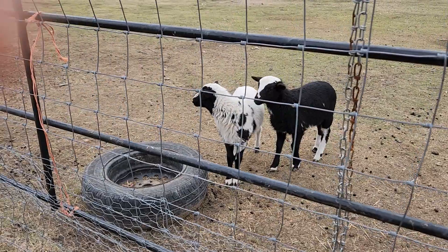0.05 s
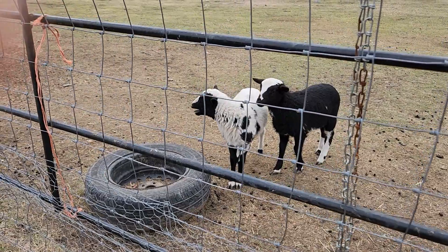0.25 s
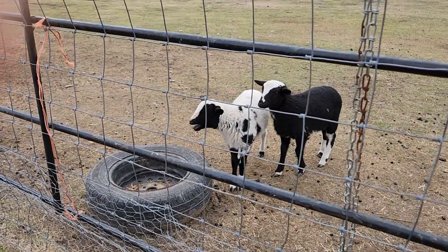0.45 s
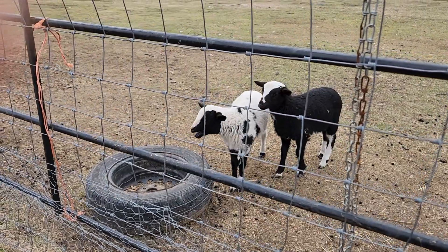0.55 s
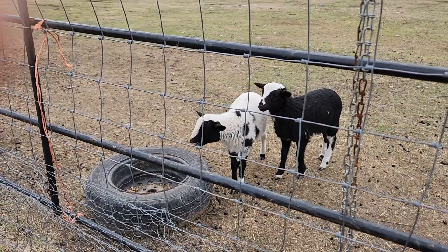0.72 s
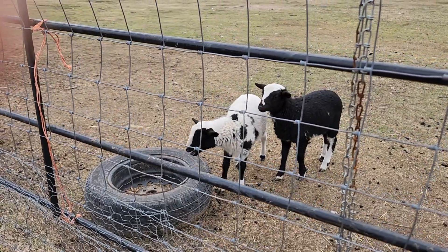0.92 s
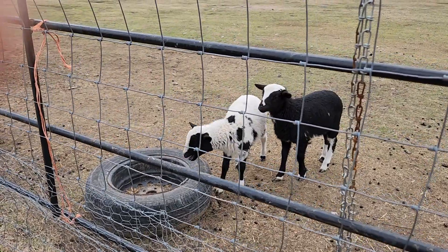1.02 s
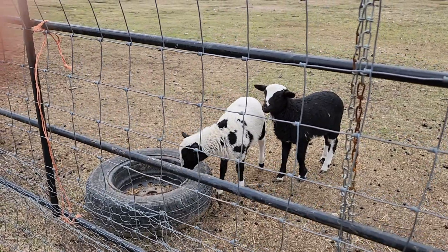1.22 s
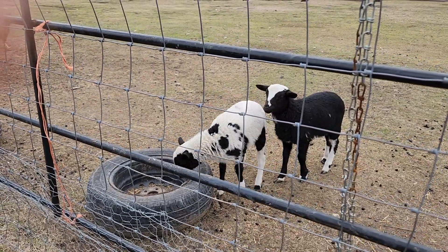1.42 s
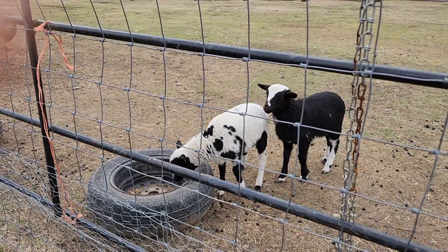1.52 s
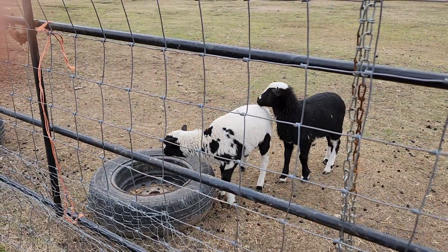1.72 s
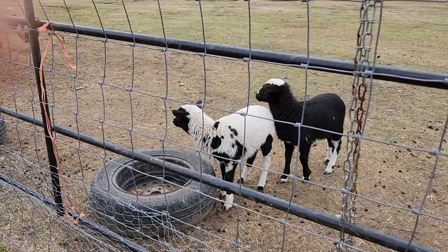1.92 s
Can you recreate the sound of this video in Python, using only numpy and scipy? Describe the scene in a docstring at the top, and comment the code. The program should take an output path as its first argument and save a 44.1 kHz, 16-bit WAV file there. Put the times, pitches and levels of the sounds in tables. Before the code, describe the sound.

A lamb gives one long, loud bleat outdoors, close by. After a faint rustle and a breathy puff, the call creaks open at about 0.2 seconds and rasps up into a bright, steady tone. It sags and fades near 1.4 seconds, leaving a quiet, closed-mouth creak until about 1.8 seconds. Another faint rustle follows, and a soft low rumble runs underneath throughout.

```python
"""A lamb gives one long bleat in an open paddock while it lowers its head.
Its vocal folds are a pulse source, its throat and mouth a filter: the call starts as a creak, rasps up
into a bright tone, clears, sags and ends in a quiet, closed-mouth creak. The ground reflection
interferes with the direct sound, and its delay shortens as the head sinks. A breathy puff of air leads
into the call, with soft rustles before and after; faint scatter, low rumble and air lie under it all."""
import sys
import numpy as np
from scipy import signal
from scipy.fft import rfft, irfft, next_fast_len
from scipy.io import wavfile
from scipy.ndimage import uniform_filter1d, minimum_filter1d, map_coordinates

SR = 44100
rng = np.random.default_rng(int(sys.argv[2]) if len(sys.argv) > 2 else 0)


def inscribe(sig):
    """Save sig as 16-bit PCM at rate SR to the path in sys.argv[1].

    A 1-D sig is mono; a 2-D sig holds one channel per row.
    Samples are clipped to [-1, 1] before scaling.
    """
    pcm = np.round(np.clip(np.atleast_2d(sig).T, -1, 1) * 32767)
    wavfile.write(sys.argv[1], SR, pcm.astype(np.int16))


N = 85995
T = np.arange(N) / SR
FFT_SIZE = next_fast_len(N + SR // 2, True)
HZ = np.maximum(np.fft.rfftfreq(FFT_SIZE, 1 / SR), 1)
CUTOFF_HZ = 15900


# Pulse rate and strength of the opening creak: t/s, f/Hz, level/dB
OPENING_CREAK = [(.205, 116, -49.5), (.221, 120, -26), (.245, 140, -28.5), (.28, 112, -56.5),
                 (.32, 320, -21), (.36, 220, -66)]
# Shelf on the highest treble: t/s, gain/dB
TOP_TREBLE = [(.3, -3), (.5, -7), (.85, -2), (1.0, 2.5), (1.2, 9), (1.34, 19)]

def lamb():
    """Source-filter model of the voice: opening creak, bleat and closing creak."""
    folds, gain = creak(OPENING_CREAK, jitter=.03, breath=.5)
    call = gain * open_mouth(folds) + bleat()
    call = shelf(call, hz=9800, gain_db=in_time(TOP_TREBLE)[0])
    return treble_flicker(call) + closing_creak()


# Vibration rate of the folds: t/s, f/Hz
FOLD_PITCH = [(0.29, 321.9), (0.318, 340.4), (0.33, 368), (0.334, 377), (0.354, 381), (0.37, 385.4),
              (0.4, 392.8), (0.504, 415.7), (0.584, 422.1), (0.802, 427.2), (1.1, 421.8), (1.224, 411),
              (1.3, 397.4), (1.33, 383.5), (1.342, 363), (1.36, 313.6)]
# Envelope of the bleat: t/s, level/dB
BLEAT_LEVEL = [(.22, -33.5), (0.258, -22), (0.29, -17.5), (0.304, -12), (.35, -14.5), (.40, -16),
               (0.448, -12.5), (.52, -10), (.57, -12.5), (.66, -11.5), (.98, -16.5), (1.201, -14),
               (1.331, -20), (1.367, -30), (1.39, -92)]
# Irregularity of the folds: t/s, rasp level/dB, alternation level/dB
FOLD_STRAIN = [(.28, -5, -12), (.335, -7.5, -11.5), (.375, -51, -68), (.48, -27, -22), (.62, -28, -15),
               (.85, -21, -26), (.93, -38, -39), (1.12, -31.5, -49), (1.17, -24.5, -41.5),
               (1.28, -33.5, -28), (1.35, -21, -22.5)]
# Weak sine added at the fundamental: t/s, level/dB
FUNDAMENTAL_LEVEL = [(.26, -56), (.33, -46.5), (.7, -50), (.9, -59), (1.05, -68.5), (1.34, -61.5)]

def bleat():
    """Vocal-fold oscillation: strain adds jitter, turbulent hiss and period doubling to the pulses."""
    start_s, end_s = BLEAT_LEVEL[0][0], BLEAT_LEVEL[-1][0]
    slack_s = np.maximum(np.minimum(T, end_s) - FOLD_PITCH[-1][0], 0)
    pitch = in_time(FOLD_PITCH)[0] * 2 ** (-12 * slack_s)  # slack folds fall 12 octaves a second
    rasp, unevenness = from_db(in_time(FOLD_STRAIN))
    cycles = np.cumsum(pitch * (1 + .0023 * drift(rate_hz=25))) / SR
    alternation = unevenness * np.cos(np.pi * cycles + .3 * drift(rate_hz=20))  # at half the pitch
    jitter = .06 * rasp * drift(rate_hz=180)
    cycles = cycles + jitter + .049 * alternation
    hiss = rms_one(rng.standard_normal(N) * (1 + np.cos(2 * np.pi * cycles)) ** 2)
    source = pulse_train(cycles, pitch) * (1 + .69 * alternation) + .32 * rasp * hiss
    voice = open_mouth(source) * from_db(in_time(BLEAT_LEVEL)[0])
    fundamental = from_db(in_time(FUNDAMENTAL_LEVEL)[0]) * np.sqrt(2) * np.sin(2 * np.pi * cycles)
    return (voice + fundamental) * ((T > start_s) & (T < end_s))


def creak(curve, jitter, breath):
    """Pulse register: slack folds slap slowly, each time with a puff of air. Returns source and gain."""
    rate, level_db = in_time(curve)
    start_s, end_s = curve[0][0], curve[-1][0]
    cycles = np.cumsum(rate * (1 + jitter * drift(rate_hz=49)) * (T > start_s)) / SR
    cycles += rate * np.minimum(T - start_s, 0)  # the phase reaches zero at the onset
    puffs = rms_one(rng.standard_normal(N) * np.exp(-5 * (cycles % 1)))
    gain = from_db(level_db) * ((T > start_s) & (T < end_s))
    return pulse_train(cycles, rate) + breath * puffs, gain


# Response of the open throat at scale 1: f/Hz, gain/dB
THROAT_RESPONSE = [(200, -31), (420, -40.5), (620, -27), (850, -4.5), (1020, -13), (1270, 9), (1480, 4.5),
                   (1700, -2), (1900, -9), (2130, -10), (2550, -5.5), (3000, -2), (3400, -5.5), (3850, -2),
                   (4250, -3), (4750, -13), (5550, -8), (6500, -20), (7300, -11), (7900, -18), (8500, -5),
                   (9200, -15), (10100, -9), (11200, -22), (12700, -22.5), (14400, -15), (16000, -28.5)]
# Its resonances sink as the mouth closes: t/s, frequency ratio
FORMANT_SCALE = [(.27, 1), (.4, 0.97), (1.12, 1.0), (1.22, 0.95), (1.3, 0.943), (1.36, 0.92)]

def throat(source):
    """Time-frequency scaling: filtering on a stretched time axis slides all formants together."""
    samples = np.arange(N)
    stretched = np.cumsum(in_time(FORMANT_SCALE)[0])
    warped = map_coordinates(source, [np.interp(samples, stretched, samples)], order=5)
    return map_coordinates(coloured(warped, THROAT_RESPONSE), [stretched], order=5)


# Mouth resonance and treble shelf: t/s, f/Hz, resonance gain/dB, treble gain/dB
MOUTH_FORMANT = [(.3, 3380, 13.5, -11.5), (.38, 3110, 16.5, 1.5), (.48, 3094, 19, 7.5),
                 (.68, 3030, 13, 5.5), (.85, 2740, 17.5, 5.5), (.98, 2530, 17, 7), (1.15, 2760, 10, -4),
                 (1.26, 2726, 10.5, -10), (1.35, 2620, 3, -23)]
# Narrow peak or notch, deepest as the mouth closes: t/s, f/Hz, gain/dB
NASAL_BAND = [(.3, 1760, 5), (.55, 1820, 7), (.8, 1880, -6), (1.1, 1850, -3.5), (1.2, 1740, 10),
              (1.28, 1590, -19), (1.35, 1630, -2)]

def open_mouth(source):
    """Formant filtering by throat and moving mouth, carried to the microphones at constant power."""
    formant_hz, formant_db, treble_db = in_time(MOUTH_FORMANT)
    nasal_hz, nasal_db = in_time(NASAL_BAND)
    voice = resonance(throat(source), nasal_hz, nasal_db, width_hz=110)
    voice = resonance(voice, formant_hz, formant_db, width_hz=564)
    voice = shelf(voice, hz=5420, gain_db=treble_db)
    return constant_power(at_microphones(ground_reflection(voice)))


# Pulse rate and strength of the closing creak: t/s, f/Hz, level/dB
CLOSING_CREAK = [(1.37, 153, -36), (1.424, 148, -40), (1.5, 154, -38), (1.585, 154, -37), (1.594, 196, -60),
                 (1.607, 140, -60), (1.613, 151, -36), (1.658, 148, -46.5), (1.666, 147, -55),
                 (1.68, 147, -63.5), (1.69, 146, -38.5), (1.74, 143, -50.5), (1.79, 129, -61)]
# Response of the nearly closed mouth: f/Hz, gain/dB
CLOSED_RESPONSE = [(150, -11), (400, -4.5), (610, 1.5), (850, -11.5), (1100, -14), (1400, 0), (1700, -1),
                   (2060, 7.5), (2500, -13.5), (2930, -9), (3250, -25), (3700, -14.5), (4250, -24.5),
                   (5100, -8.5), (5600, -20.5), (6300, -18), (7000, -37), (8600, -35), (10500, -58),
                   (16000, -42)]
# Its changing colour: t/s, treble gain/dB, ring f/Hz, ring gain/dB
CLOSED_COLOUR = [(1.38, 5.5, 2894, 9), (1.58, 8.5, 2920, 11), (1.65, 6, 3000, 1), (1.69, -12, 3700, 19),
                 (1.78, 1.5, 3650, 20)]

def closing_creak():
    """Low-pass filtering: the nearly closed mouth muffles slow pulses, and an upper resonance rings."""
    folds, gain = creak(CLOSING_CREAK, jitter=.012, breath=.4)
    treble_db, ring_hz, ring_db = in_time(CLOSED_COLOUR)
    voice = shelf(coloured(folds, CLOSED_RESPONSE), hz=2310, gain_db=treble_db)
    voice = resonance(voice, ring_hz, ring_db, width_hz=280)
    return gain * constant_power(at_microphones(voice))


def treble_flicker(x, spread_db=2.8):
    """Random amplitude modulation: the treble flickers slowly, differently in each band and channel."""
    centres, spacing = np.linspace(4600, CUTOFF_HZ, 16, retstep=True)
    out = x
    for hz in centres:
        band = filtered(x, np.maximum(1 - abs(HZ - hz) / spacing, 0))
        flicker_db = spread_db * np.array([drift(rate_hz=5), drift(rate_hz=5)])
        out = out + band * (from_db(flicker_db) - 1)
    return out


# Extra travel time of the reflected path: t/s, delay/ms
GROUND_DELAY = [(.35, 1.425), (.44, 1.395), (.54, 1.39), (.64, 1.41), (.72, 1.304), (.83, 1.24),
                (.97, 1.205), (1.08, 1.036), (1.18, 0.88), (1.3, 0.95)]

def ground_reflection(x, reflected_gain=.59):
    """Two-path interference: the direct sound plus its bounce off the ground form a moving comb filter."""
    delay_ms, = in_time(GROUND_DELAY)
    reflected = map_coordinates(x, [np.arange(N) - delay_ms * SR / 1000], order=3)
    return x + reflected_gain * reflected


# Left microphone relative to right: f/Hz, level/dB, phase lead/rad
STEREO_DIFFERENCE = [(400, -5, 1), (850, 6, 0.92), (1280, 5.5, 1.52), (1640, 2.5, 2.17), (2110, 9.5, 1),
                     (2360, 13, -0.5), (3036, 8, 1.5), (3308, 5, 2.5), (3720, 11, -1.3), (4600, -4.5, -0.5),
                     (5240, -2, -3.5), (5090, -45.5, 2.5), (6540, 8.5, 1.5), (6760, 9.5, 3),
                     (8300, 12, 0.5), (10770, 4, 1.5), (12000, -4, 2.07), (16000, 0.5, 1.1)]

def at_microphones(x):
    """Interchannel level and phase differences: each microphone hears the lamb in its own colour."""
    balance_db, lead = in_hz(STEREO_DIFFERENCE)
    tilt = from_db(balance_db / 2)
    rms_gain = np.sqrt((tilt ** 2 + tilt ** -2) / 2)
    return filtered(x, np.array([tilt, np.exp(-1j * lead) / tilt]) / rms_gain)


def scatter(x, t60_s=.17, level_db=-8):
    """Diffuse reflection from fence and ground: a short decaying tail, different at each microphone."""
    tail = rng.standard_normal((2, N)) * from_db(-60 * T / t60_s) * (T > .006)
    response = rfft(rms_one(tail) / np.sqrt(N), FFT_SIZE)
    return from_db(level_db) * filtered(x.mean(axis=0), response)


# Noise bursts: onset t/s, decay time/s, level before the envelope/dB, centre f/Hz, half-width/octaves
RUSTLES_AND_PUFF = [(.003, 0.02, -37.5, 5100, 0.42), (0.074, 0.029, -48.5, 3750, 0.38),
                    (.165, 0.11, -43.5, 1760, 0.86), (1.804, 0.026, -50, 9100, 0.887),
                    (1.915, .04, -55, 4210, 0.29)]

def rustles_and_puff(attack_s=.02):
    """Decaying band-limited noise: soft rustles, and a breathy puff of air just before the bleat."""
    out = np.zeros((2, N))
    for onset_s, decay_s, level_db, hz, octaves in RUSTLES_AND_PUFF:
        age = np.maximum(T - onset_s, 0)
        band = 1 / (1 + (np.log2(HZ / hz) / octaves) ** 2)
        noise = rms_one(filtered(rng.standard_normal((2, N)), band))
        out += from_db(level_db) * noise * np.minimum(age / attack_s, 1) * np.exp(-age / decay_s)
    return out


# Spectrum of the low rumble: f/Hz, relative level/dB
RUMBLE_SPECTRUM = [(12, -38), (20, -23.5), (65, 1), (97, -6), (123, -1.5), (137, -10), (151, -9.5),
                   (182, -16.5), (308, -28.5), (343, -32.5), (461, -39.5), (500, -39.5), (650, -71),
                   (1100, -120)]
# Spectrum of the faint air: f/Hz, relative level/dB
AIR_SPECTRUM = [(240, -50), (400, -11.5), (570, -2), (892, -8.5), (1070, -9.5), (1630, -19), (1870, -18.5),
                (2280, -24.5), (16000, -35)]

def background(spectrum, level_db, side_db):
    """Partial coherence: steady outdoor noise, one part in phase at both microphones, one in antiphase."""
    mid, side = filtered(rng.standard_normal((2, N)), from_db(in_hz(spectrum)[0]))
    return from_db(level_db) * rms_one(mid + from_db(side_db) * side * np.array([[1], [-1]]))


def pulse_train(cycles, pitch):
    """Fourier synthesis: equal harmonics below the Nyquist limit sum to one sharp pulse a cycle."""
    harmonics = np.floor(.42 * SR / pitch.max())
    half_phase = np.pi * (cycles % 1) + 1e-9
    return rms_one(1 - np.sin((2 * harmonics + 1) * half_phase) / np.sin(half_phase))


def resonance(x, hz, gain_db, width_hz, block=128):
    """A gliding two-pole resonator raises or lowers the band around its centre."""
    band, state = np.zeros(N), np.zeros(2)
    radius = np.exp(-np.pi * width_hz / SR)
    b = np.array([1, 0, -1]) * (1 - radius ** 2) / 2
    for i in range(0, N, block):
        a = [1, -2 * radius * np.cos(2 * np.pi * hz[i] / SR), radius ** 2]
        band[i:i + block], state = signal.lfilter(b, a, x[i:i + block], zi=state)
    return x + (from_db(gain_db) - 1) * band


def shelf(x, hz, gain_db):
    """Shelving filter: raises or lowers everything above a frequency."""
    return x + (from_db(gain_db) - 1) * filtered(x, 1 / (1 + (hz / HZ) ** 8))


def coloured(x, spectrum):
    """Minimum-phase filter: folding the cepstrum makes the given response causal."""
    cepstrum = irfft(np.log(from_db(in_hz(spectrum)[0])), FFT_SIZE)
    cepstrum[1:FFT_SIZE // 2] *= 2
    cepstrum[FFT_SIZE // 2 + 1:] = 0
    return filtered(x, np.exp(rfft(cepstrum)))


def filtered(x, response):
    """Convolution as a product of spectra."""
    return irfft(rfft(x, FFT_SIZE) * response, FFT_SIZE)[..., :N]


def drift(rate_hz):
    """Random fluctuation: low-pass noise of unit power."""
    return rms_one(filtered(rng.standard_normal(N), 1 / (1 + (HZ / rate_hz) ** 2)))


def constant_power(x, window=900):
    """Automatic gain control: holds the short-term power at one."""
    power = uniform_filter1d(uniform_filter1d(np.mean(x ** 2, axis=0), window), window)
    return x / np.sqrt(np.maximum(power, 1e-12))


def rms_one(x):
    """Normalisation to unit power."""
    return x / np.sqrt(np.mean(x ** 2) + 1e-20)


def from_db(db):
    """Level to amplitude ratio."""
    return 10 ** (np.asarray(db) / 20)


def in_time(rows):
    """Linear interpolation of each column over time."""
    times, *columns = np.transpose(rows)
    return [np.interp(T, times, column) for column in columns]


def in_hz(rows):
    """Linear interpolation of each column over log frequency."""
    hz, *columns = np.transpose(rows)
    return [np.interp(np.log(HZ), np.log(hz), column) for column in columns]


def scene():
    """Superposition of the lamb, its scatter, the rustles and puff, rumble and air."""
    voice = lamb()
    foreground = voice + scatter(voice) + rustles_and_puff()
    rumble = background(RUMBLE_SPECTRUM, level_db=-33.5, side_db=-21)
    air = background(AIR_SPECTRUM, level_db=-52.5, side_db=.5)
    return foreground + rumble + air


def record(dry, ceiling=.98):
    """Peak limiting by a fast, smoothed gain, then a steep low-pass filter."""
    gain = np.minimum(1, ceiling / (abs(dry).max(axis=0) + 1e-9))
    limited = dry * uniform_filter1d(minimum_filter1d(gain, size=129), size=129)
    return filtered(limited, 1 / (1 + (HZ / CUTOFF_HZ) ** 300))


dry = scene()
out = record(dry)
inscribe(out)
```